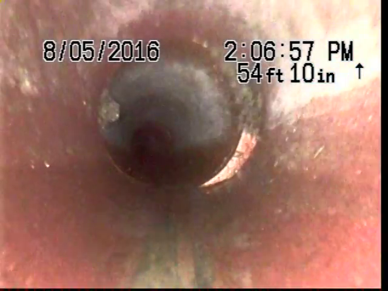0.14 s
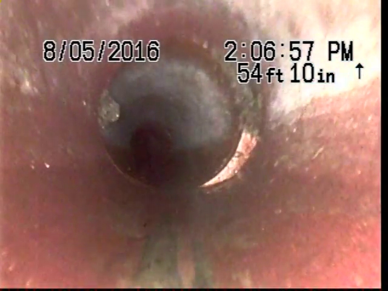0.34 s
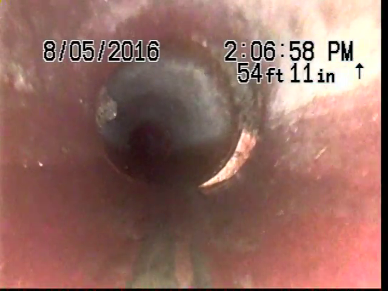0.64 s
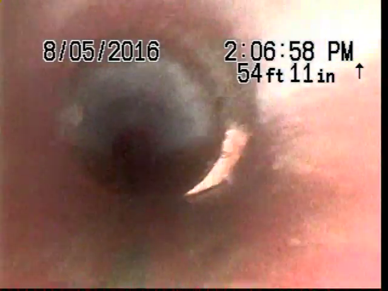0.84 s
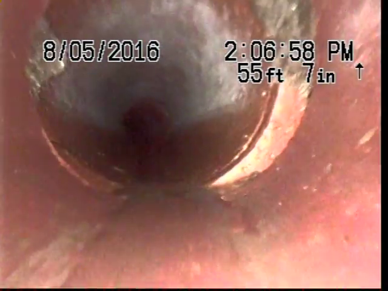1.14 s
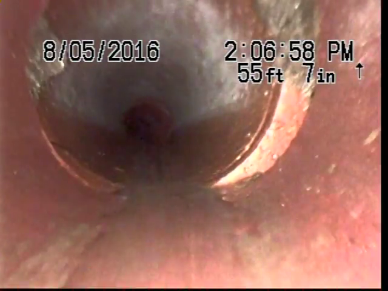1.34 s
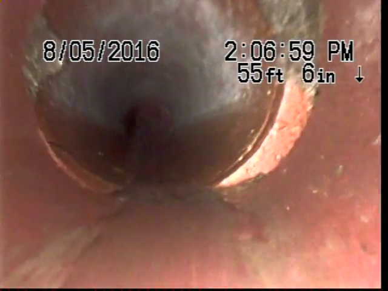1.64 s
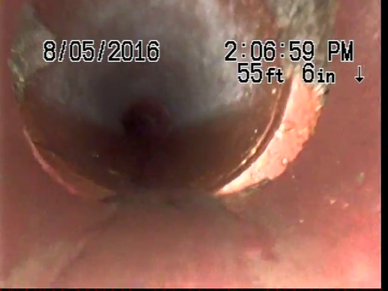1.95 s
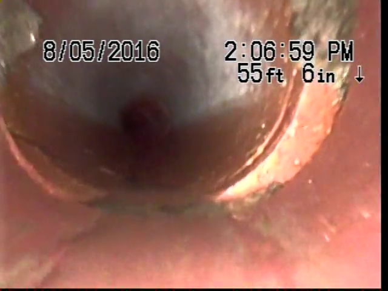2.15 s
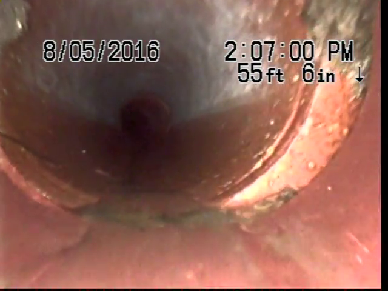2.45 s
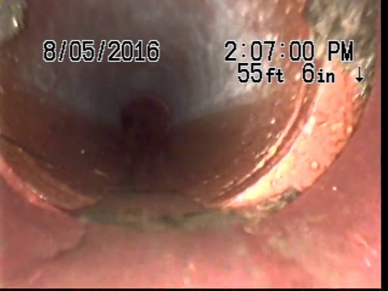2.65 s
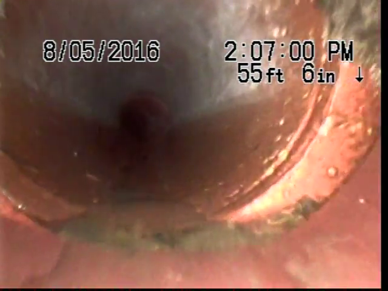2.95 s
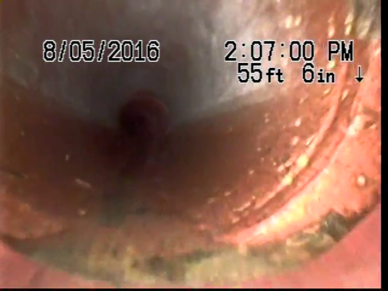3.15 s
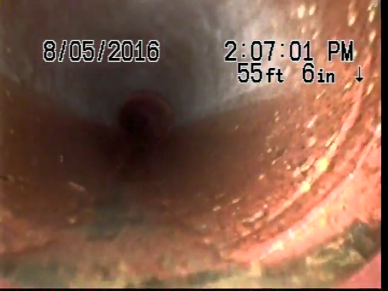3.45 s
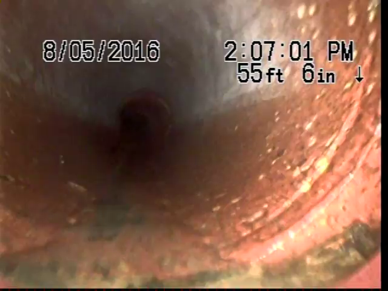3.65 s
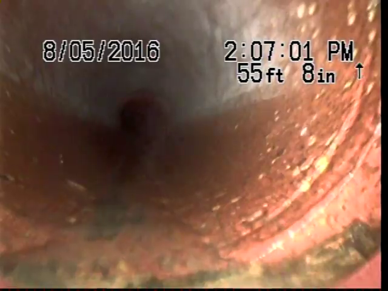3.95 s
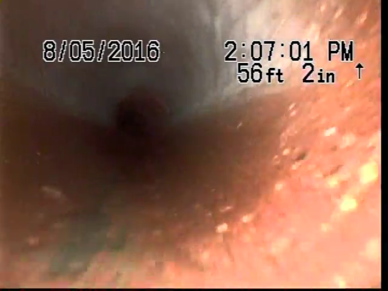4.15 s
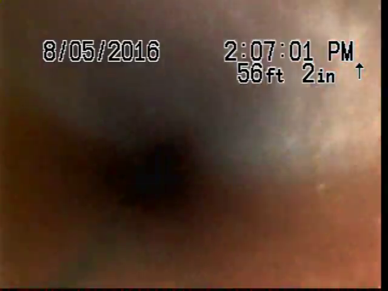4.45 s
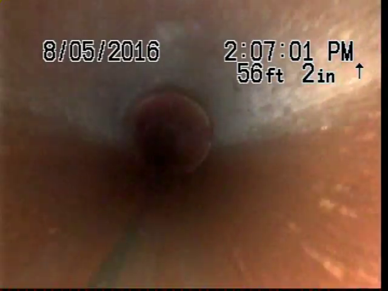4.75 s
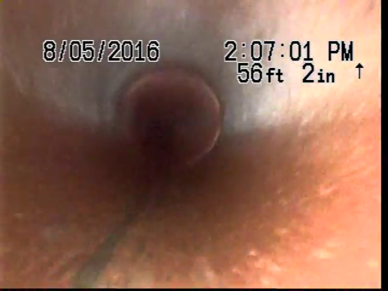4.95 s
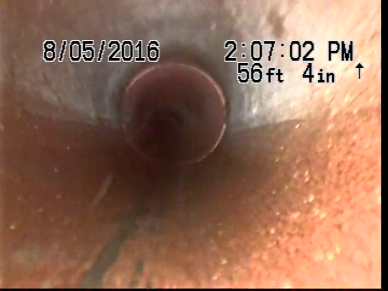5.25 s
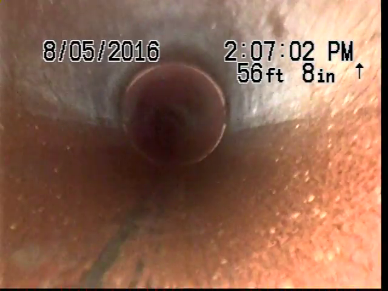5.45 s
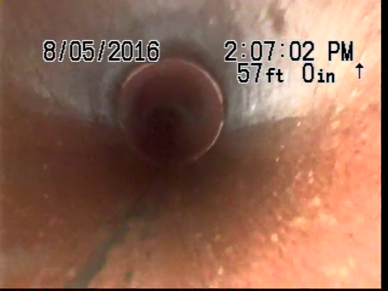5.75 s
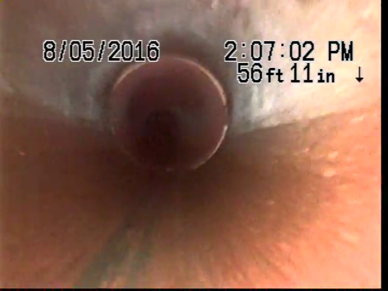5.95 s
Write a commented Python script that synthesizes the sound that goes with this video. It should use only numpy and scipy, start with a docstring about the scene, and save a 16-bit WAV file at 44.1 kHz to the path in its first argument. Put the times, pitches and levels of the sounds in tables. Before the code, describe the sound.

A stiff cable is shoved in bursts down a pipe, rasping and rubbing, with sharp metallic clacks and dull knocks over steady electronic hum, hiss and buzz.

```python
"""The push cable of an inspection camera is fed by hand into a pipe: three long shoves, with light glides before,
between and after them. It rasps on the pipe's lip, rubs and sizzles, all made of random tiny slips and noise;
where it binds, it rings. Short bursts of chatter ring the metal reel as clacks and the pipe as dull knocks,
in a small room. Under it all the monitor hums, hisses, buzzes at the picture rate, whistles at the line rate
and ticks: sines, shaped noise and repeating pulses."""
import sys
import numpy as np
from scipy import signal
from scipy.fft import rfft, irfft, next_fast_len
from scipy.io import wavfile
from scipy.ndimage import uniform_filter1d

SR = 44100
rng = np.random.default_rng(int(sys.argv[2]) if len(sys.argv) > 2 else 0)


def dump_mix(stems):
    """Bounce the given channels to the path in sys.argv[1] as a 16-bit WAV at rate SR."""
    frames = np.atleast_2d(stems).T  # one column per channel
    limited = np.clip(frames, -1, 1)  # hard clip at full scale
    pcm = np.round(limited * 32767).astype(np.int16)
    wavfile.write(sys.argv[1], SR, pcm)


N = 269230
TIME = np.arange(N) / SR   # seconds
ROOM_T60_S = 0.32          # time for the echo to fade by 60 dB
CUTOFF_HZ = 15800          # nothing much is heard above this
FIELD_HZ = 59.94           # picture rate
LINE_HZ = 15735.5          # line rate

# In every spectrum the level is power per Hz, and only its shape counts: the loudness is set elsewhere.

# steady hum of the electronics: f/Hz, level/dB (rms)
HUM_TONES = [(46.0, -68), (134.0, -74), (188.0, -70), (275.0, -84.5), (322.0, -75), (940.0, -61),
             (1504.0, -64)]
# spectrum of the amplifier hiss: f/Hz, level/dB
HISS_SPECTRUM = [(20, 2), (80, -2.5), (450, -5), (800, 1.5), (1150, -2), (2000, 0), (2700, -11), (3400, 0),
                 (4000, -10), (5700, -4), (6600, -7.5), (9700, -9.5), (10300, -1), (11000, -11),
                 (15500, -8.5)]
# pulses in each picture's sync interval:
# delay t/s, length t/s, voltage step level/dB, switching spike level/dB, crackle level/dB
# (steps and spikes as they are before the bass is taken out)
SYNC_PULSES = [(0.00135, 0.00035, -50, -38, -47), (0.00170, 0.00058, -45, -41, -47.5),
               (0.00223, 0.00051, -52, -40, -46.5), (0.0030, 0.00058, -50, -81, -50)]
# line whistle and its sidebands: distance from the line rate f/(picture rates),
# level/dB (rms, before the level of the whole whistle)
WHISTLE_TONES = [(0, -56.5), (-1, -60), (-2, -64), (-3, -69), (-4, -73), (-5, -73), (-6, -74), (-11, -75),
                 (-12, -75)]

# dull knocks on the pipe: t/s, level/dB (rough peak of the wall sound before filter and room)
PIPE_KNOCKS = [(0.432, -39), (0.910, -37), (3.9621, -15.5), (5.127, -25), (5.331, -31), (6.034, -37)]
# what the pipe wall rings with: f/Hz, width f/Hz, level/dB (relative)
PIPE_MODES = [(656, 100, 1), (780, 88, 1), (915, 154, -5), (1190, 140, -5.5), (2300, 510, -8)]
# cable clacks on the reel: t/s, level/dB (rough peak before the room),
# low ring level/dB (-15.5 leaves the low modes as they are), chatter length t/s
REEL_CLACKS = [(0.204, -40.5, -17, 0.0099), (0.732, -20, -18, 0.0066), (0.8623, -15.7, -21, 0.0045),
               (0.9065, -5, -15, 0.0064), (1.143, -35.5, -15, 0.0035), (1.35, -33.5, -16.5, 0.0029),
               (1.65, -47, -14, 0.008), (3.814, -17, -16.5, 0.0032), (3.902, -23, -24, 0.0036),
               (3.9818, -12, -17.5, 0.0041), (4.021, -18.5, -19, 0.0053), (4.389, -28.5, -32, 0.0018),
               (5.122, -15, -8, 0.016), (5.236, -25, -30, 0.006), (5.274, -15.5, -18, 0.0028),
               (5.3285, -4.5, -16, 0.0041), (5.345, -18, -18, 0.004), (5.437, -15, -21, 0.0066),
               (5.4793, -19.5, -19, 0.0035), (6.031, -24.5, -8, 0.0042)]
# what the reel rings with: f/Hz, width f/Hz, level/dB (relative, before each clack's own changes)
REEL_MODES = [(1096, 180, -17.5), (1380, 360, -15.5), (1775, 305, -9), (2460, 325, -6.5), (3060, 510, -8.5),
              (3670, 360, -5.5), (4230, 273, -1), (5020, 550, -6), (5760, 440, -7), (6677, 1030, -15),
              (8100, 2500, -22), (11900, 3200, -33.5)]
# long contacts are soft and leave the reel's highest modes quiet
CRISP_DB, SOFT_DB_PER_S, SOFT_ABOVE_HZ = 4, 800, 6000

# the cable binds, drags hoarsely and comes free: comes free t/s, level/dB (then), build-up level/(dB per s)
BINDINGS = [(4.45, -53, 332), (4.63, -46.3, 38), (4.705, -40, 130), (5.97, -47, 200), (6.046, -39.5, 280)]
# what the drag rings with: f/Hz, width f/Hz, level/dB (relative)
BINDING_MODES = [(1201, 17, 0), (1344, 61, 0), (1490, 150, -5), (1600, 49, 0.5), (1724, 80, 3.5)]
DRAG_RELEASE_DB_PER_S = 170

# spectrum of the rasp at the pipe's lip: f/Hz, level/dB
RASP_SPECTRUM = [(900, -45), (1800, -16.5), (2450, -11), (3100, -6.5), (3650, -4.5), (3900, -4.5),
                 (4250, -2.5), (4800, -4), (5200, -6.5), (5600, -8), (6400, -13), (8000, -23), (12000, -41)]
# spectrum of the rub on the pipe wall: f/Hz, level/dB
RUB_SPECTRUM = [(120, -30), (250, -15), (430, -9), (560, -6.5), (720, 0.7), (1000, -0.5), (1300, 2),
                (1750, 1.5), (2300, 1), (3200, -2), (5500, -7), (8000, -25)]
# spectrum of the fine sizzle: f/Hz, level/dB
SIZZLE_SPECTRUM = [(4000, -11.5), (6100, 1.5), (6900, 1), (7500, 1), (8300, 0), (9300, -3.5), (10000, -3),
                   (11600, -5.5), (13000, -7), (13900, -6.5), (15000, -9), (17000, -16)]
# spectrum of the pipe's boom, which follows the rub: f/Hz, level/dB
BOOM_SPECTRUM = [(40, -24), (100, -13.5), (170, -7.5), (215, 0.5), (250, -6.5), (320, -11), (450, -19),
                 (900, -27.5)]
# hard shoves: start t/s, full force t/s, let go t/s,
# rasp level/dB, rub level/dB, sizzle level/dB (all at full force)
HARD_SHOVES = [(0.533, 0.605, 0.926, -36, -43.5, -43.5), (3.52, 3.738, 4.027, -32, -40.5, -42),
               (4.99, 5.2, 5.46, -37, -44, -46.5)]
# weaker, steady stretches of friction before, under and after the stronger movements:
# start t/s, stop t/s, rasp level/dB, rub level/dB, sizzle level/dB
WEAK_STRETCHES = [(0.0, 0.015, -53, -54, -68), (0.194, 0.326, -57.5, -63.5, -72),
                  (0.338, 0.494, -47.5, -54.5, -64), (0.96, 1.155, -52, -53, -69),
                  (2.0, 2.174, -63.5, -62, -74), (4.03, 4.38, -48, -51.5, -55.5),
                  (4.42, 4.9, -46, -53.5, -62), (4.918, 5.13, -46.5, -47.5, -68),
                  (5.505, 6.104, -47, -53.5, -59.5)]
# light glides before, between and after the shoves: start t/s, stop t/s, final level/dB, centre f/Hz,
# sizzle level/dB (relative to the glide)
LIGHT_GLIDES = [(0.338, 0.49, -45.5, 4910, -5), (3.014, 3.13, -44.5, 4050, -5),
                (3.188, 3.389, -43, 4220, -4), (4.241, 4.332, -44, 4170, -5.5),
                (5.627, 6.033, -42.4, 4300, -5)]
GLIDE_GROWTH_DB_PER_S = 16
# how fast a movement starts and stops; a shove leans in more slowly
ATTACK_DB_PER_S, SHOVE_ATTACK_DB_PER_S, RELEASE_DB_PER_S = 340, 130, 178
# a shove gathers force up to its full force
RASP_CLIMB_DB_PER_S, RUB_CLIMB_DB_PER_S, SIZZLE_CLIMB_DB_PER_S = 33.5, 59, 35
# then, as the cable presses on the wall, the rub grows and the sizzle dies
RUB_GROWTH_DB_PER_S, SIZZLE_FADE_DB_PER_S = 7.5, 44
# faint steady rasp and rub noise that fills in the background throughout
FAINT_RASP_DB, FAINT_RUB_DB = -68, -68.5


def from_db(db):
    """Turn decibels into a gain."""
    return 10 ** (np.asarray(db) / 20)


def rms_one(x):
    """Scale a sound to an rms of 1."""
    return x / np.sqrt(np.mean(x ** 2) + 1e-20)


def coloured(x, spectrum):
    """Filter a steady sound with a smooth spectrum and scale it to an rms of 1."""
    hz, db = np.transpose(spectrum)
    size = next_fast_len(N)
    bins = np.maximum(np.fft.rfftfreq(size, 1 / SR), 1)
    gain = from_db(np.interp(np.log(bins), np.log(hz), db))
    return rms_one(irfft(rfft(x, size) * gain, size)[:N])


def noise(spectrum):
    """Random noise with a given spectrum and an rms of 1."""
    return coloured(rng.standard_normal(N), spectrum)


def drift(rate):
    """Random wander with an rms of 1, heading for a new value 'rate' times a second."""
    return rms_one(np.interp(TIME * rate, np.arange(4096), rng.standard_normal(4096)))


def resonance(x, hz, width_hz):
    """Ring at one frequency, which passes with a gain of 1; a narrower width rings longer."""
    r = np.exp(-np.pi * width_hz / SR)
    feed = np.array([1, 0, -1]) * (1 - r * r) / 2
    feedback = [1, -2 * r * np.cos(2 * np.pi * hz / SR), r * r]
    return signal.lfilter(feed, feedback, x)


def add(out, s, sound):
    """Mix a sound in at a given time."""
    at = max(int(s * SR), 0)
    out[at:at + len(sound)] += sound[:N - at]


def room(x, wet_db):
    """Add the room's echo: a noisy tail that swells within 4.2 ms, then fades away."""
    t = TIME[:SR // 2]
    tail = rng.standard_normal(len(t)) * from_db(-60 * t / ROOM_T60_S) * np.clip(t / 0.0042, 0, 1)
    echo = signal.fftconvolve(x, tail / np.linalg.norm(tail))[:N]
    return x + from_db(wet_db) * echo


def before(s):
    """Seconds still to go until a moment; zero after it."""
    return np.maximum(s - TIME, 0)


def after(s):
    """Seconds gone since a moment; zero before it."""
    return np.maximum(TIME - s, 0)


def moving_db(start, stop, attack_db_per_s=ATTACK_DB_PER_S):
    """Level of one movement: it rises until start, holds, and falls from stop."""
    return -attack_db_per_s * before(start) - RELEASE_DB_PER_S * after(stop)


def together(levels_db):
    """Gain of overlapping movements: their powers add."""
    return np.sqrt(sum(from_db(db) ** 2 for db in levels_db))


def hum():
    """The electronics hum on a few steady sine tones."""
    tones = 0
    for hz, db in HUM_TONES:
        wave = np.sin(2 * np.pi * (hz * TIME + rng.random()))   # random starting point
        tones = tones + from_db(db) * np.sqrt(2) * wave
    return tones


def amplifier_hiss(level_db):
    """The amplifier hisses: steady noise with an uneven spectrum."""
    return from_db(level_db) * noise(HISS_SPECTRUM)


def picture_buzz(droop_hz):
    """Each picture's sync interval leaks into the sound as voltage steps, spikes and a short crackle."""
    since = TIME % (1 / FIELD_HZ)
    steps, spikes, crackle = 0, 0, 0
    for delay, length, step_db, spike_db, crackle_db in SYNC_PULSES:
        inside = np.minimum(since - delay, delay + length - since)
        gate = np.clip(inside * SR / 2 + .5, 0, 1)
        steps = steps - from_db(step_db) * gate
        spikes = spikes + from_db(spike_db) * np.sinc(2 * CUTOFF_HZ * (since - delay))
        crackle = crackle + from_db(crackle_db) * gate
    high_pass = signal.butter(1, droop_hz, "high", fs=SR, output="sos")   # held steps sag back to zero
    coupled = signal.sosfilt(high_pass, steps + spikes)
    return coupled + crackle * noise([(300, -8), (2000, 5), (5500, 0.5), (8000, -25), (15000, 6.5)])


def line_whistle(level_db):
    """The line rate sings thinly; its sidebands line up once per picture and make it swell."""
    tones = 0
    for k, db in WHISTLE_TONES:
        cycles = LINE_HZ * TIME + k * FIELD_HZ * (TIME - .003)
        tones = tones + from_db(db) * np.sqrt(2) * np.cos(2 * np.pi * cycles)
    return from_db(level_db) * tones


def display_ticks(thump_db, tick_db):
    """The distance readout refreshes about five times a second: a burst of ringing noise and a low thump."""
    since = (TIME - .003) % .2006
    tick = np.exp(-since / 0.0018) * rms_one(resonance(rng.standard_normal(N), 8400, 1500))
    thump = resonance(np.exp(-since / 0.0032), 90, 120)
    return from_db(tick_db) * tick + from_db(thump_db) * thump


def electronics():
    """All the monitor's own noises, running throughout."""
    steady = hum() + amplifier_hiss(level_db=-59.5)
    picture = picture_buzz(droop_hz=183) + line_whistle(level_db=-3.0)
    return steady + picture + display_ticks(thump_db=-51.5, tick_db=-54.0)


def blow(modes, chatter_s, after_db, after_s, crest_db):
    """A few milliseconds of chattering contact, then a fading rattle, ring a body; peak near 1."""
    t = TIME[:SR // 6]
    age = t / max(chatter_s, .001)
    chatter = 2 * np.sqrt(age) * np.exp(-age ** 2)
    rattle = from_db(after_db) * np.minimum(age, 1) * np.exp(-t / after_s)
    contact = (chatter + rattle) * rng.choice([-1, 1], len(t))
    body = 0
    for k, (hz, width, db) in enumerate(modes):
        body = body + (-1) ** k * from_db(db) * resonance(contact, hz, width)   # every other mode is flipped
    loudest_rms = np.sqrt(np.max(uniform_filter1d(body ** 2, size=SR // 250)))   # over 4 ms
    return body / (loudest_rms * from_db(crest_db))


def knocks(thud_hz, thud_db, thud_s):
    """The cable bumps the pipe: a hollow clonk from the wall and a low, fading thud from the air inside."""
    wall, air = np.zeros((2, N))
    t = TIME[:SR // 3]
    thud = from_db(thud_db) * np.sin(2 * np.pi * thud_hz * t) * np.exp(-t / thud_s)
    for s, peak_db in PIPE_KNOCKS:
        clonk = blow(PIPE_MODES, chatter_s=0.0029, after_db=-10.5, after_s=0.0088, crest_db=7)
        add(wall, s, from_db(peak_db) * clonk)
        add(air, s, from_db(peak_db) * thud)
    high_pass = signal.butter(3, 580, "high", fs=SR, output="sos")   # a stiff wall radiates little bass
    return room(signal.sosfilt(high_pass, wall), wet_db=-4) + air


def clacks():
    """The cable slaps the reel and rings its modes; each slap has its own low ring, long ones a duller top."""
    out = np.zeros(N)
    for s, peak_db, low_db, chatter_s in REEL_CLACKS:
        top_db = CRISP_DB - SOFT_DB_PER_S * chatter_s
        modes = []
        for hz, width, db in REEL_MODES:
            lowness = np.clip((3600 - hz) / 1400, 0, 1)   # 1 up to 2200 Hz, 0 from 3600 Hz
            change_db = (low_db + 15.5) * lowness + top_db * (hz > SOFT_ABOVE_HZ)
            modes.append((hz, width, db + change_db))
        add(out, s, from_db(peak_db) * blow(modes, chatter_s, after_db=-5.5, after_s=0.021, crest_db=8.5))
    return room(out, wet_db=-12)


def friction(spectrum, slips_per_s, spread_db, smooth_db, judder_db):
    """Countless tiny slips of uneven size over a smooth hiss; the pressure judders."""
    sizes = from_db(spread_db * np.minimum(rng.exponential(1, N), 4)) * rng.choice([-1, 1], N)
    slips = rms_one(sizes * (rng.random(N) < slips_per_s / SR))
    hiss = from_db(smooth_db) * rng.standard_normal(N)
    contact = (slips + hiss) * from_db(judder_db * drift(70))
    return coloured(room(contact, wet_db=-7.0), spectrum)


def drag():
    """Stick and slip of the binding cable rings a cluster of close modes, louder until it comes free."""
    spectrum = [(600, 1), (1000, 7.5), (2000, 3), (3000, 0)]   # f/Hz, level/dB
    slips = friction(spectrum, slips_per_s=900, spread_db=1.5, smooth_db=-3, judder_db=1.2)
    body = sum(from_db(db) * resonance(slips, hz, width) for hz, width, db in BINDING_MODES)
    levels_db = []
    for s, db, build_up in BINDINGS:
        levels_db.append(db - build_up * before(s) - DRAG_RELEASE_DB_PER_S * after(s))
    return together(levels_db) * rms_one(body)


def glide_db(start, stop, final_db):
    """A glide grows louder until the hand stops."""
    return final_db + moving_db(start, stop) - GLIDE_GROWTH_DB_PER_S * before(stop)


def glide(half_width_hz):
    """Each glide hisses in one narrow band: slow noise shifted up to the glide's own pitch."""
    low_pass = signal.butter(3, half_width_hz, fs=SR, output="sos")
    slow = signal.sosfilt(low_pass, rng.standard_normal((2, N)))
    out = np.zeros(N)
    for start, stop, final_db, centre_hz, _ in LIGHT_GLIDES:
        phase = 2 * np.pi * centre_hz * TIME
        band = rms_one(slow[0] * np.cos(phase) + slow[1] * np.sin(phase))
        out += from_db(glide_db(start, stop, final_db)) * band
    return out


def friction_gains():
    """How strong the rasp, rub and sizzle are: shoves, weak stretches and glides over a faint background."""
    rasp, rub, sizzle = [FAINT_RASP_DB], [FAINT_RUB_DB], []
    for start, full, stop, rasp_db, rub_db, sizzle_db in HARD_SHOVES:
        on_db = moving_db(start, stop, SHOVE_ATTACK_DB_PER_S)
        early, late = before(full), after(full)
        rasp.append(rasp_db + on_db - RASP_CLIMB_DB_PER_S * early)
        rub.append(rub_db + on_db - RUB_CLIMB_DB_PER_S * early + RUB_GROWTH_DB_PER_S * late)
        sizzle.append(sizzle_db + on_db - SIZZLE_CLIMB_DB_PER_S * early - SIZZLE_FADE_DB_PER_S * late)
    for start, stop, rasp_db, rub_db, sizzle_db in WEAK_STRETCHES:
        on_db = moving_db(start, stop)
        rasp.append(rasp_db + on_db)
        rub.append(rub_db + on_db)
        sizzle.append(sizzle_db + on_db)
    for start, stop, final_db, _, sizzle_db in LIGHT_GLIDES:
        level_db = glide_db(start, stop, final_db)
        rasp.append(level_db)   # as strong as the glide's narrow hiss
        sizzle.append(level_db + sizzle_db)
    return together(rasp), together(rub), together(sizzle)


def sliding_cable(boom_db):
    """Rasp at the lip, dull rub on the wall and fine sizzle swell with movement; the rub makes the pipe boom."""
    rasp_gain, rub_gain, sizzle_gain = friction_gains()
    rasp = friction(RASP_SPECTRUM, slips_per_s=2500, spread_db=1.5, smooth_db=4.0, judder_db=1.0)
    rub = friction(RUB_SPECTRUM, slips_per_s=1500, spread_db=2.5, smooth_db=-1.5, judder_db=2.0)
    sizzle = friction(SIZZLE_SPECTRUM, slips_per_s=6700, spread_db=4.0, smooth_db=5.0, judder_db=0.64)
    boom = from_db(boom_db) * noise(BOOM_SPECTRUM)
    return rasp_gain * rasp + rub_gain * (rub + boom) + sizzle_gain * sizzle


def scene():
    """Cable, reel and pipe over the monitor's own noise."""
    background = electronics()
    hits = knocks(thud_hz=220.0, thud_db=-21, thud_s=0.031) + clacks()
    cable = drag() + glide(half_width_hz=620) + sliding_cable(boom_db=-14.5)
    return (background + hits + cable)[None]


def record(dry):
    """The loudest peaks are flattened below a ceiling and the highest treble is cut."""
    ceiling = .38
    limited = dry / (1 + (dry / ceiling) ** 6) ** (1 / 6)
    low_pass = signal.ellip(12, .1, 70, CUTOFF_HZ, fs=SR, output="sos")
    return signal.sosfilt(low_pass, limited)


dry = scene()
out = record(dry)
dump_mix(out)
```